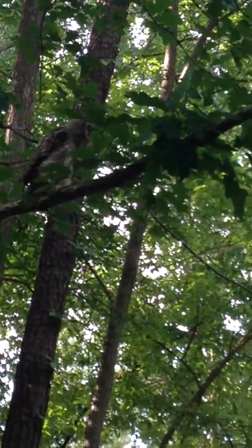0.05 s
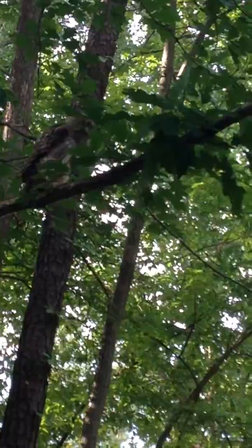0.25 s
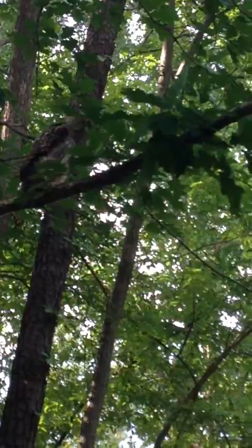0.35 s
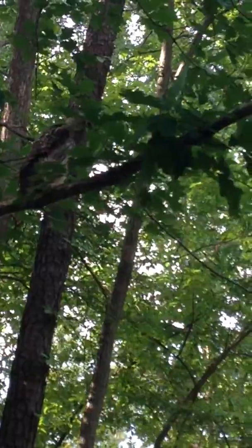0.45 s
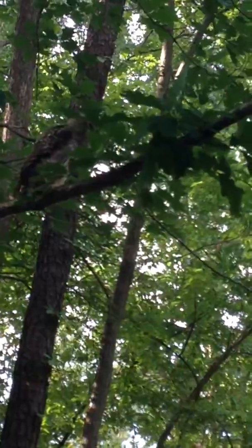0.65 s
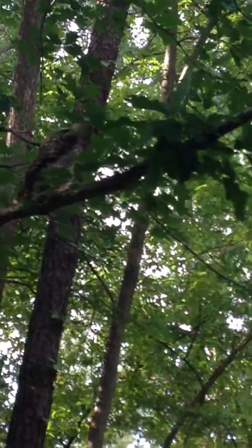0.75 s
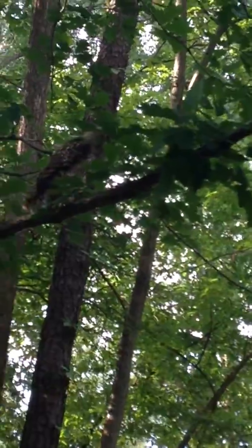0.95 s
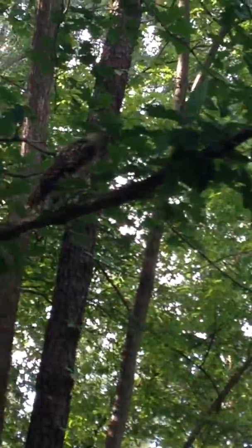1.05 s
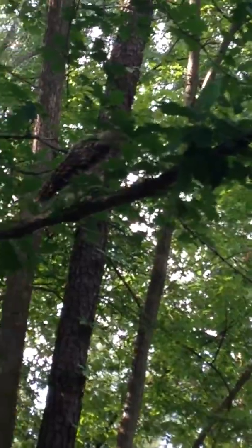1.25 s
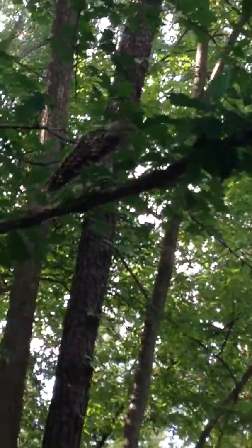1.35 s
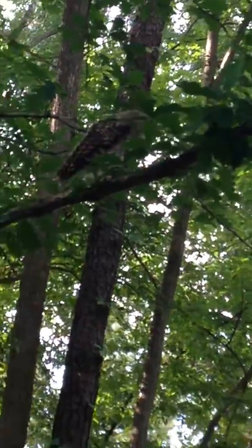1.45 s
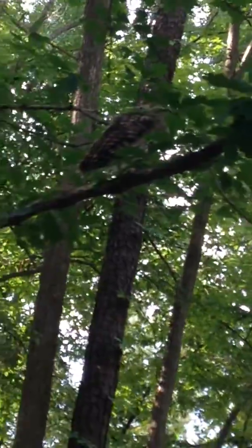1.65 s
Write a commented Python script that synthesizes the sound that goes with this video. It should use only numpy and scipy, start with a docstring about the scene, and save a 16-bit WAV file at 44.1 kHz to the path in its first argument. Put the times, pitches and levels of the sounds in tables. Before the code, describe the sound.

A young owl gives one long, harsh, hissing screech in quiet woods.

```python
"""A bird's thin, hissing call ends in a falling whistle, over a quiet, low woodland rumble.
Then a young owl on a branch gives one long begging screech: a whistle near 3 kHz that starts
almost clean and breaks up into a harsh hiss, with air rushing through its open beak.
Afterwards a small bird chips once. The trees scatter every call."""
import sys
import numpy as np
from scipy import signal
from scipy.fft import rfft, irfft, next_fast_len
from scipy.io import wavfile
from scipy.ndimage import map_coordinates

SR = 44100
rng = np.random.default_rng(int(sys.argv[2]) if len(sys.argv) > 2 else 0)


def master_out(mix):
    """Clip the mix to full scale and print it as 16-bit PCM to the path in sys.argv[1]."""
    frames = np.transpose(np.atleast_2d(mix))
    ceiling = np.clip(frames, -1, 1)
    pcm = np.round(ceiling * 32767).astype(np.int16)
    wavfile.write(sys.argv[1], SR, pcm)


N = 74970

# the first bird's lower whistle: t/s, f/Hz, level/dB
THIN_WHISTLE = [(0, 7000, -64), (.045, 7110, -53), (.095, 7120, -69), (.14, 7160, -55), (.203, 7000, -56),
                (.213, 6780, -46), (.226, 6330, -48), (.243, 5450, -58), (.255, 5370, -65)]
# colour of its hiss: f/Hz, level/dB
THIN_HISS_EQ = [(1300, -16), (2600, -10.5), (3300, 1.5), (5000, 0), (6800, 3), (7500, -8), (8600, -10),
                (9700, -26), (10700, -12), (11800, -29), (15000, -20)]
# ring of the wood, as time to fall 60 dB: f/Hz, t/s
WOOD_DECAY = [(500, 1), (3000, .45), (7000, 0.58), (14000, 0.93)]
# colour of the distant rumble: f/Hz, level/dB
RUMBLE_EQ = [(20, -36), (30, -15), (42, -7), (60, 1.5), (110, 0), (170, -5), (210, -8), (270, -7.5),
             (350, -9.5), (480, -8.5), (620, -16), (1000, -18.5), (1400, -25.5), (3000, -41)]
# its slow rise and fall: t/s, level/dB
RUMBLE_LEVEL = [(0, -56.5), (.45, -55.5), (1.0, -57), (1.35, -58.5), (1.7, -57.5)]
# colour of the faint foliage hiss: f/Hz, level/dB
FOLIAGE_EQ = [(600, -15), (1400, -4.5), (2200, -2.5), (3200, 1), (5500, -1.5), (6800, -3.5), (8300, -10.5),
              (10000, -13), (15000, -29)]
# distant drones, each a bell-shaped swell: centre t/s, width (sigma) t/s, f/Hz, level/dB
DRONES = [(0.636, 0.6, 116.3, -65.5), (1.619, 0.21, 65.66, -59.5)]
# pitch line of the owl's whistle: t/s, f/Hz
OWL_PITCH = [(.375, 3168), (.398, 3200), (.422, 3550), (.432, 3000), (.46, 3101), (.52, 3170), (.6, 3244),
             (.8, 3439), (.87, 3368), (.96, 3538), (1.06, 3363), (1.16, 3318), (1.22, 3413)]
# how hard the owl pushes it: t/s, level/dB
OWL_LEVEL = [(.37, -62), (.4, -58), (.43, -42.5), (.485, -38), (.55, -39), (.61, -41), (.7, -38.5),
             (.8, -38), (.86, -43), (.93, -35), (1.02, -35), (1.11, -38), (1.145, -33), (1.18, -44),
             (1.208, -37), (1.24, -65)]
# how far it has broken up: t/s, roughness/0-1
OWL_ROUGHNESS = [(.4, .35), (.425, 0.52), (.47, 0.31), (.52, 0.42), (.58, 0.5), (.72, 0.78), (1.0, 0.77),
                 (1.16, 0.74), (1.225, 0.88)]
# spread of the broken whistle around its pitch: offset f/Hz, level/dB
TURBULENCE_EQ = [(20, -9), (110, -5), (220, -8), (420, -13), (650, -18), (1000, -25.5), (2000, -51)]
# the throat's passband for the whistle: f/Hz, level/dB
THROAT_EQ = [(1500, -25), (2400, -5.5), (2700, -14.5), (2840, -15), (2960, -17), (3080, -2.5), (3500, -2.5),
             (3720, -1.5), (3850, -1.5), (4050, -1), (4300, -6), (6000, -4)]
# instants when the whistle catches and rings clean: centre t/s, width (sigma) t/s, level/dB
CLEAN_CATCHES = [(0.401, 0.0062, -43), (.459, 0.0047, -30.5), (0.52, 0.0033, -30.5), (0.918, 0.0022, -29.5),
                 (.996, 0.0015, -30), (1.021, 0.0019, -32.5), (1.057, 0.0027, -29.5), (1.155, 0.0017, -28),
                 (1.193, 0.0028, -31.5)]
# air rushing through the open beak: t/s, level/dB
BREATH_LEVEL = [(.385, -73), (.435, -58.5), (.52, -55.5), (.66, -50.5), (.8, -48.5), (.87, -47.5),
                (.98, -46.5), (1.1, -48), (1.215, -48), (1.245, -59.5)]
# colour of that air: f/Hz, level/dB
BREATH_EQ = [(600, -20), (1300, -19.5), (1750, -6.5), (1980, -13), (2450, -2), (3500, 3), (4800, -2.5),
             (6000, 0.5), (6800, 0), (7350, -9), (7950, -7), (8450, -21), (9000, -14.5), (10100, -12),
             (11500, -20.5), (12700, -16), (15300, -31)]
# the small bird's chip: t/s, f/Hz, level/dB
CHIP_SWEEP = [(1.395, 4870, -63), (1.3985, 5370, -55.5), (1.4012, 6160, -39), (1.4035, 6900, -43),
              (1.406, 7460, -42), (1.409, 7720, -47), (1.412, 7740, -72)]

UPPER_RATIO, UPPER_DB, UPPER_HOLD_S = 1.159, -64.5, 0.19  # the first bird's second voice
THIN_HISS_DB, THIN_HISS_HOLD_S, THIN_RELEASE_S = -54.5, 0.21, 0.076
FOLIAGE_DB = -65
SWING_LIMIT = 2.3  # the owl's syrinx saturates at this multiple of its usual swing
FLUTTER_HZ, FLUTTER_DB = 51, 2  # uneven pulsing of its voice
CHIP_OCTAVE_DB = -21.5
TOP_HZ = 15350


def amp(db):
    """Decibels to gain."""
    return 10 ** (np.asarray(db) / 20)


def unit(x):
    """Scale to rms 1."""
    return x / np.sqrt(np.mean(np.abs(x) ** 2) + 1e-20)


def along(points, hz):
    """Read a table of f/Hz, value on a log frequency axis."""
    freqs, values = np.transpose(points)
    return np.interp(np.log(hz + 1), np.log(freqs + 1), values)


def clock():
    """Time of each sample in seconds."""
    return np.arange(N) / SR


def curve(rows):
    """An automation line through a timed table's second column."""
    rows = np.array(rows)
    return np.interp(clock(), rows[:, 0], rows[:, 1])


def envelope(rows):
    """Gain from a timed table's last column; silent outside its span."""
    rows = np.array(rows)
    return amp(np.interp(clock(), rows[:, 0], rows[:, -1], left=-140, right=-140))


def swell(centre_s, width_s):
    """A bell-shaped fade in and out, peaking at 1."""
    return np.exp(-((clock() - centre_s) / width_s) ** 2 / 2)


def wobble(rate):
    """Smooth random modulation, rate knots a second."""
    return map_coordinates(rng.standard_normal(4096), [clock() * rate + 2], mode="wrap")


def filtered(x, response):
    """Equalise x with a gain given as a function of frequency."""
    size = next_fast_len(N + SR // 2)
    hz = np.fft.rfftfreq(size, 1 / SR)
    return irfft(rfft(x, size) * response(hz), size)[:N]


def noise(eq):
    """Coloured noise of rms 1."""
    return unit(filtered(rng.standard_normal(N), lambda hz: amp(along(eq, hz))))


def phase(hz):
    """Running phase of a gliding tone."""
    return 2 * np.pi * np.cumsum(hz) / SR


def tone(hz):
    """A gliding sine of rms 1."""
    return np.sqrt(2) * np.sin(phase(hz))


def thin_caller():
    """A hiss with two thin whistles in it; they dive at the end as the upper one fades."""
    def release(hold_s):
        return np.clip(1 - (clock() - hold_s) / THIN_RELEASE_S, 0, 1)

    pitch = curve(THIN_WHISTLE)
    lower = tone(pitch * (1 + 0.005 * wobble(291)))
    lower *= envelope(THIN_WHISTLE) * amp(1.1 * wobble(80))
    upper = tone(UPPER_RATIO * pitch * (1 + 0.0062 * wobble(313)))
    upper *= amp(UPPER_DB + 3.2 * wobble(71)) * release(UPPER_HOLD_S)
    hiss = noise(THIN_HISS_EQ) * amp(THIN_HISS_DB) * release(THIN_HISS_HOLD_S)
    whistles = trees(lower + upper, near_db=-11, near_t60_s=0.1, far_db=-6.5)
    return whistles + trees(hiss, near_db=-14, near_t60_s=0.09, far_db=-10)


def trees(call, near_db, near_t60_s, far_db):
    """Nearby branches add a quick scatter to a call, and the wood a longer tail."""
    hz, t, spectrum = signal.stft(rng.standard_normal(SR), SR, nperseg=256)
    decay = amp(-60 * t / along(WOOD_DECAY, hz)[:, None])
    far = signal.istft(spectrum * decay, SR, nperseg=256)[1][:SR]
    near = rng.standard_normal(SR) * amp(-60 * np.arange(SR) / SR / near_t60_s)
    echo = amp(near_db) * near / np.linalg.norm(near) + amp(far_db) * far / np.linalg.norm(far)
    return call + signal.fftconvolve(call, echo)[:N]


def woodland():
    """The bed: low rumble, faint foliage hiss and wavering drones from far away."""
    bed = noise(RUMBLE_EQ) * amp(curve(RUMBLE_LEVEL)) + noise(FOLIAGE_EQ) * amp(FOLIAGE_DB)
    for centre_s, width_s, hz, db in DRONES:
        drone = tone(hz * (1 + 0.024 * wobble(14)))
        bed += drone * amp(db + 1.5 * wobble(11)) * swell(centre_s, width_s)
    return bed


def owl():
    """A fluttering whistle breaks into turbulence and now and then catches; air rasps in the beak."""
    pitch = curve(OWL_PITCH)
    roughness = np.clip(curve(OWL_ROUGHNESS), 0, 1)
    jitter = 0.01793 * wobble(90) + 0.02986 * wobble(380)
    core = tone(pitch * (1 + roughness * jitter))
    carrier = phase(pitch)  # centres the noise band on the pitch
    turbulence = noise(TURBULENCE_EQ) * np.cos(carrier) + noise(TURBULENCE_EQ) * np.sin(carrier)
    voice = np.sqrt(1 - roughness) * core + np.sqrt(roughness) * turbulence
    swing = np.abs(signal.hilbert(voice))
    voice /= np.hypot(1, swing / SWING_LIMIT)  # soft limiting in the syrinx
    voice = unit(filtered(voice, lambda hz: amp(along(THROAT_EQ, hz))))
    flutter = np.sin(phase(FLUTTER_HZ * (1 + 0.248 * wobble(30.03))))
    whistle = voice * envelope(OWL_LEVEL) * amp(FLUTTER_DB * flutter)
    clean = tone(pitch)
    for centre_s, width_s, db in CLEAN_CATCHES:
        crossfade = swell(centre_s, width_s)
        whistle = whistle * (1 - crossfade) + clean * amp(db) * crossfade
    breath = noise(BREATH_EQ) * envelope(BREATH_LEVEL) * amp(0.5 * flutter + 0.6 * wobble(500))
    return trees(whistle + breath, near_db=-12.5, near_t60_s=0.088, far_db=-22.5)


def small_bird():
    """One chip: a very fast upward sweep with a weak octave, ringing on in the trees."""
    pitch = curve(CHIP_SWEEP)
    chip = (tone(pitch) + amp(CHIP_OCTAVE_DB) * tone(2 * pitch)) * envelope(CHIP_SWEEP)
    return trees(chip, near_db=-4, near_t60_s=0.12, far_db=1.5)


def scene():
    """The owl up front, the two other birds around its call and the woodland beneath, in mono."""
    return (owl() + thin_caller() + small_bird() + woodland())[None]


def record(dry):
    """The recorder's band limit: a brick-wall high cut on the whole mix."""
    return filtered(dry[0], lambda hz: hz < TOP_HZ)[None]


dry = scene()
out = record(dry)
master_out(out)
```